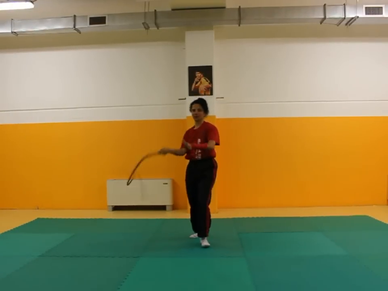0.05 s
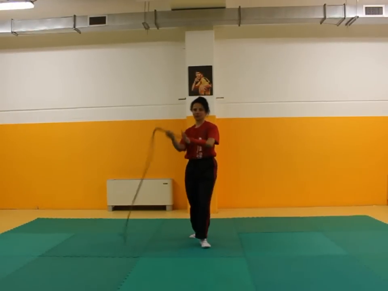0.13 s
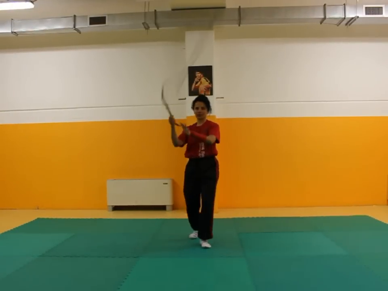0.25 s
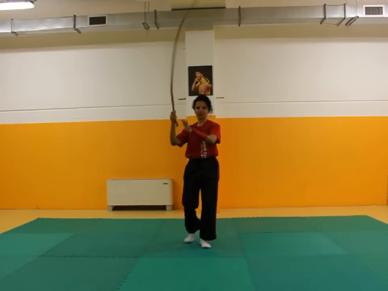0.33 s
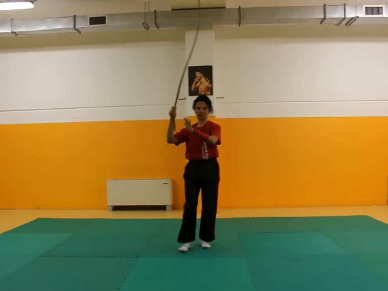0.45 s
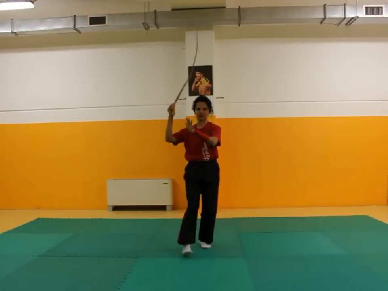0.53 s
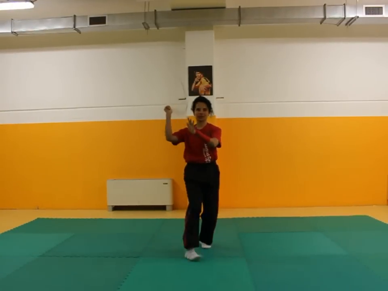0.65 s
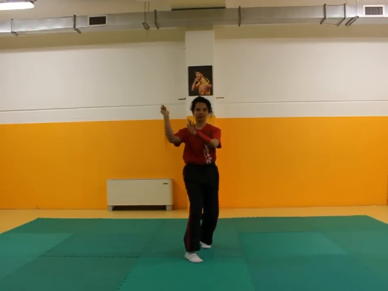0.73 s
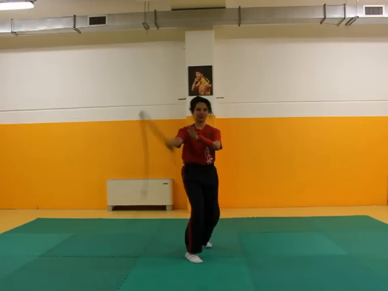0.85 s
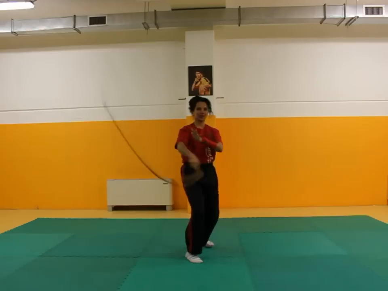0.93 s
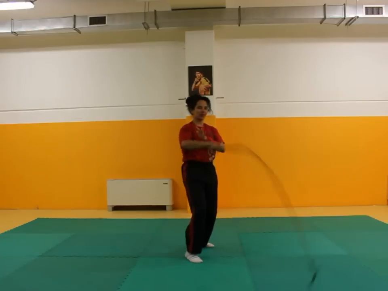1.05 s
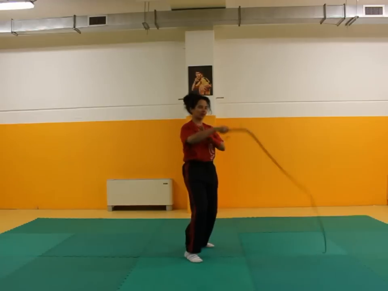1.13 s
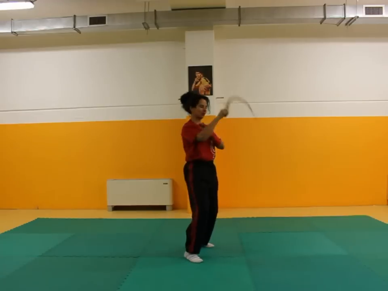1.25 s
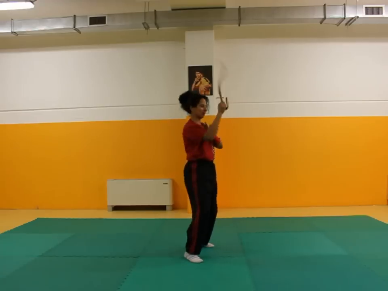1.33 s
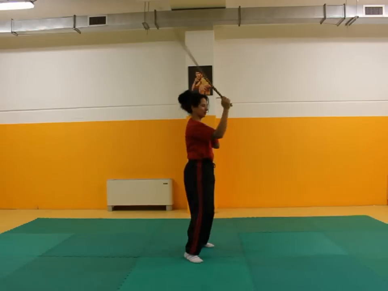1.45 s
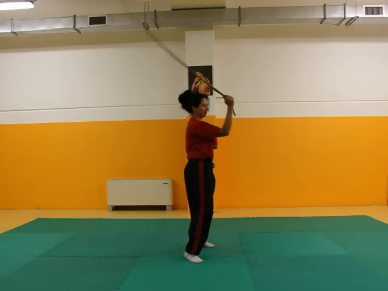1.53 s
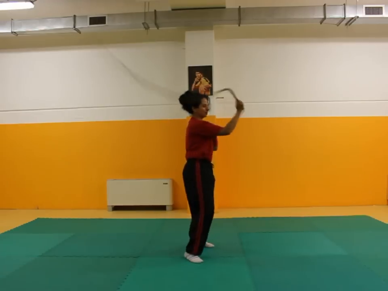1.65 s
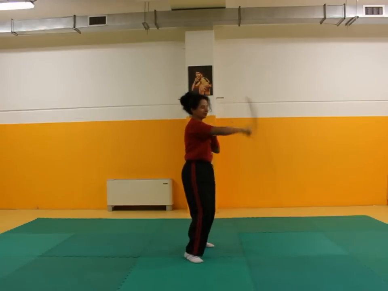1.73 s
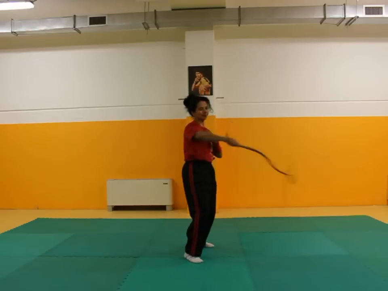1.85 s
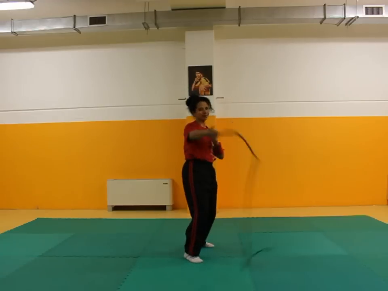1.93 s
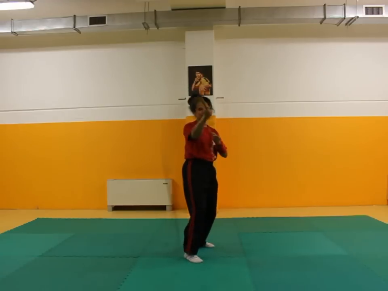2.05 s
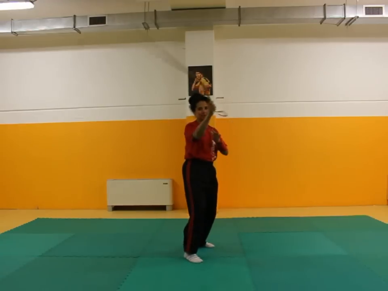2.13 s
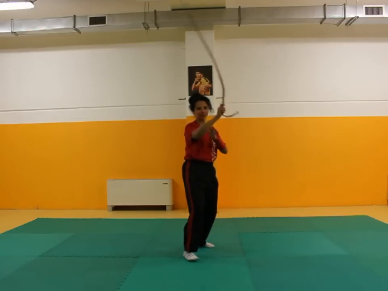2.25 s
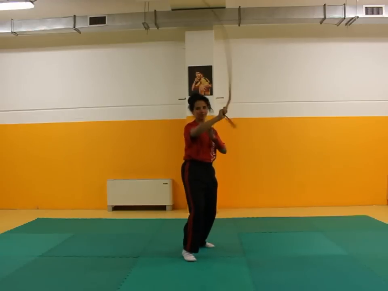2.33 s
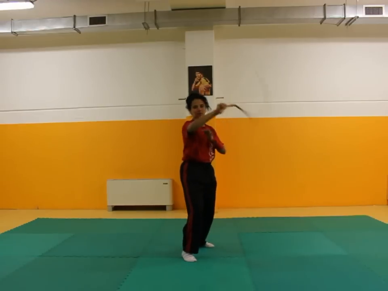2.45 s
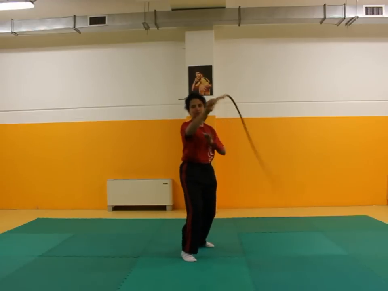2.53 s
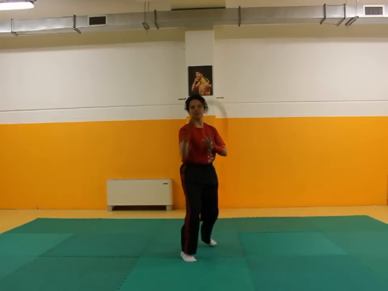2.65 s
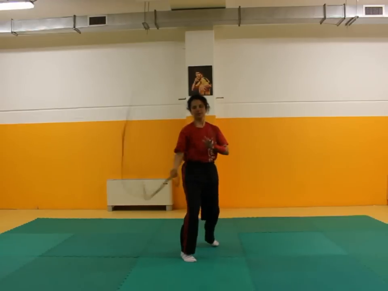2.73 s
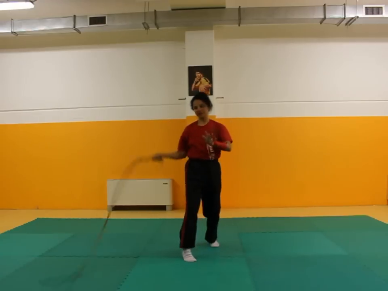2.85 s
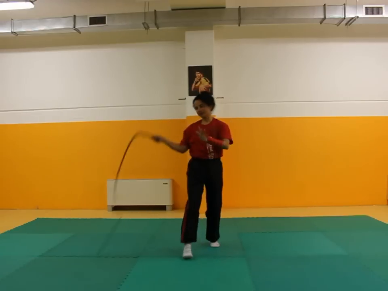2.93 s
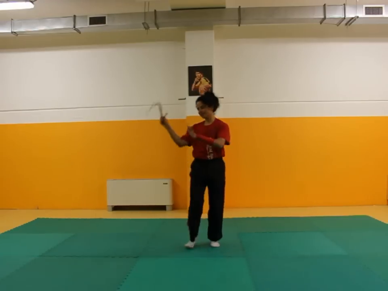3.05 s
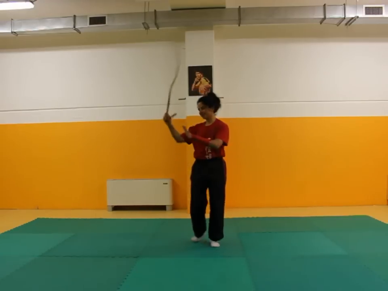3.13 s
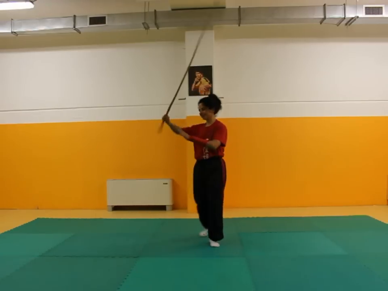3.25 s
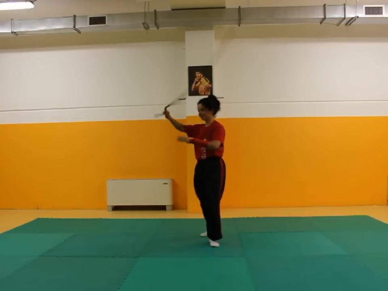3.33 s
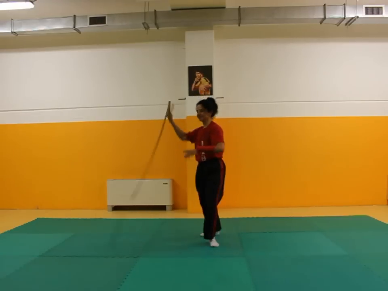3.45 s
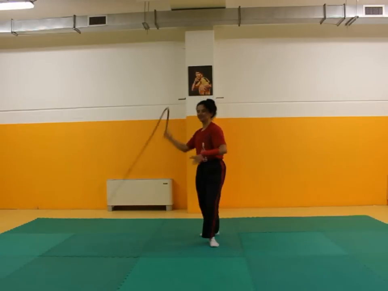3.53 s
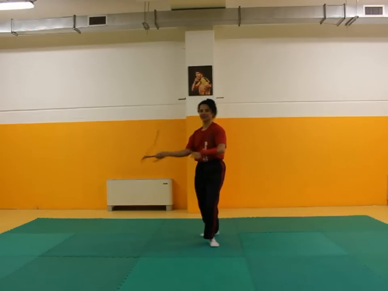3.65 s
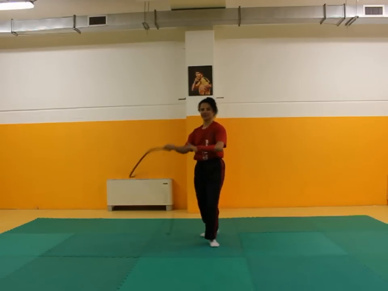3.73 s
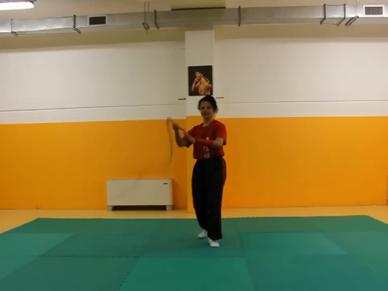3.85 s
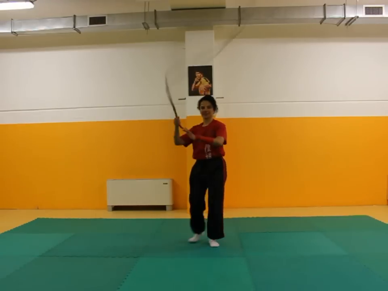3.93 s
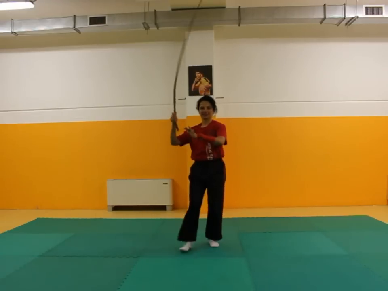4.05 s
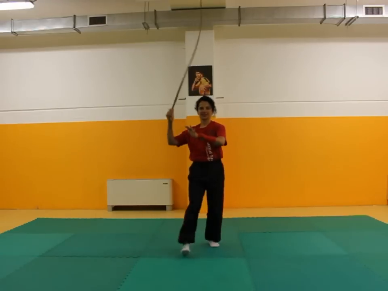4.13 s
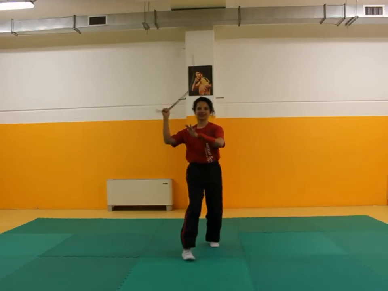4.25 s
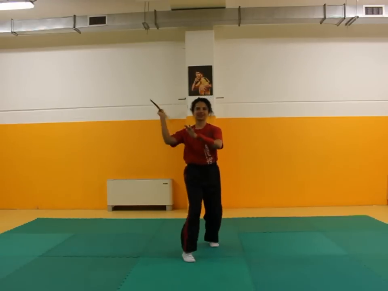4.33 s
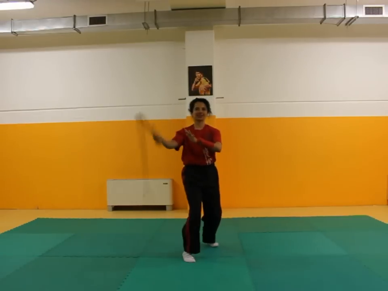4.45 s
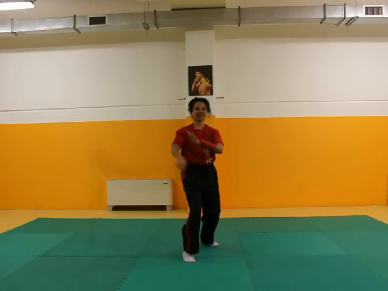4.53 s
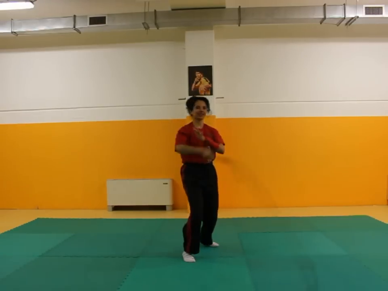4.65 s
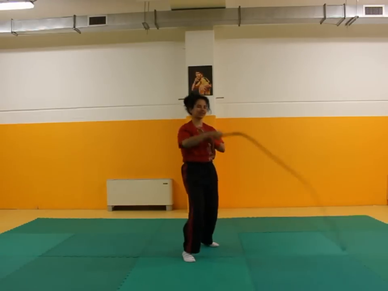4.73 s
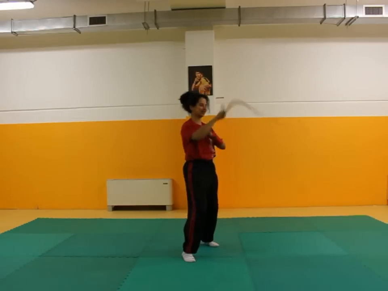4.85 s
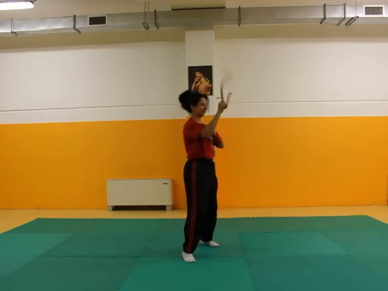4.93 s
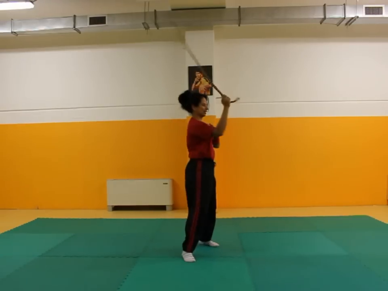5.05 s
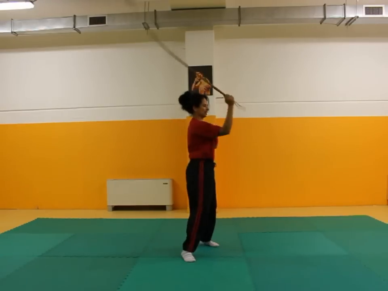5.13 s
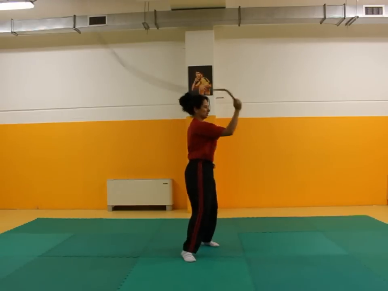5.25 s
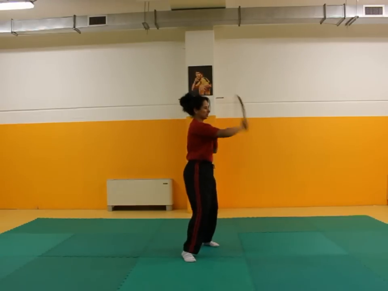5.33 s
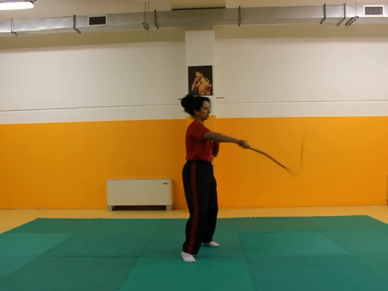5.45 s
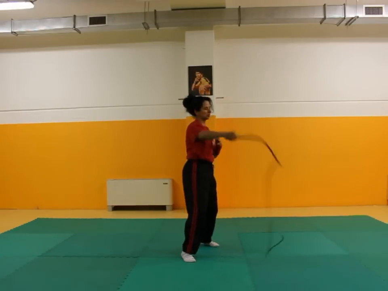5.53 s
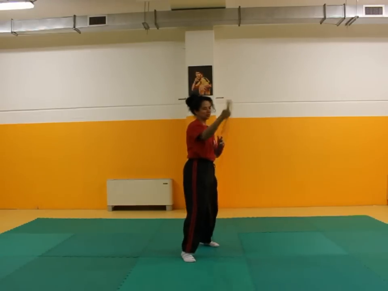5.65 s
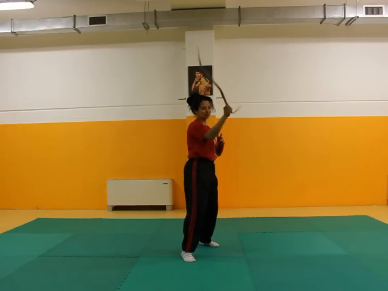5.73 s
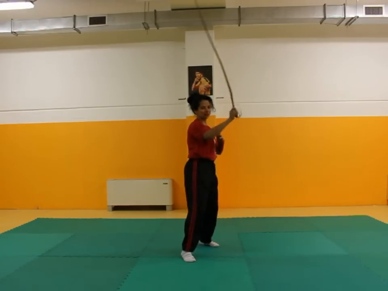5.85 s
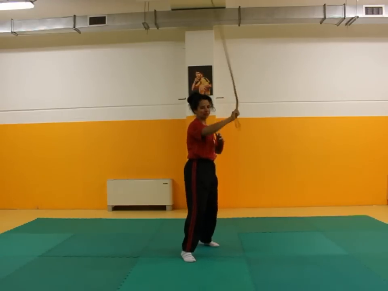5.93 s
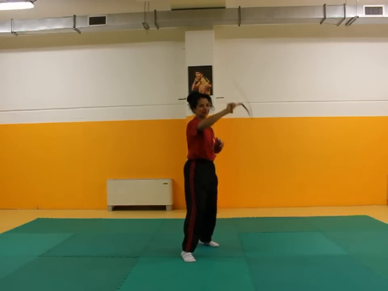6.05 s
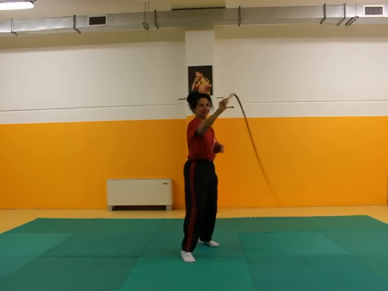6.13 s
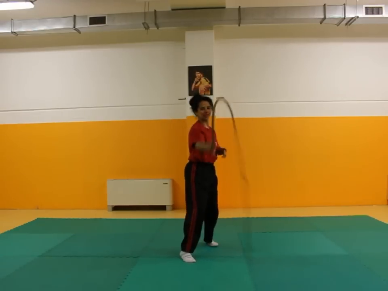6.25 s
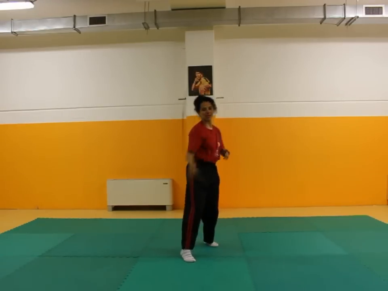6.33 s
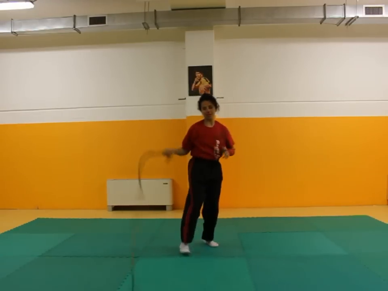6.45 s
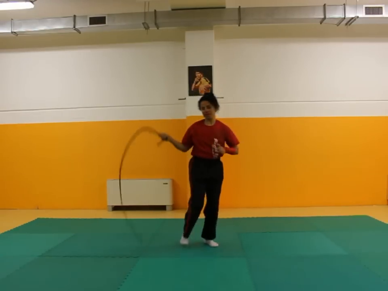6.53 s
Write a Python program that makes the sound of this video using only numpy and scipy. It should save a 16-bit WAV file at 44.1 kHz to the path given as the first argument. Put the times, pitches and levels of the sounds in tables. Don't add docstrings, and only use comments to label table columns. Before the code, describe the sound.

The scene opens inside the ringing tail of a whip crack in a large bare hall. At about 0.04 and 0.1 seconds the lash slaps a floor mat, two hollow thuds, the second stronger. A light air swish passes at 0.4, another swells from 0.8, and a piercing crack bursts at 0.9, clipping the microphone, with reflections clustered within some thirty milliseconds. Further cracks come at 1.8, 2.7, 3.6, 4.5, 5.4 and 6.3, varying in brightness and weight. After each, the gain ducks, then raises the dense, hissing reverberation, which darkens as its treble dies. Thin swishes appear near 2.55, 3.6, 3.95, 4.35, 5.2, 5.3 and just before the last crack. Softer mat contacts fall at 3.8 and 6.4. Low rumble and room air lie underneath; the last tail is still ringing at the end.

```python
import sys
import numpy as np
from scipy import signal
from scipy.fft import rfft, irfft, next_fast_len
from scipy.io import wavfile

SR = 44100
rng = np.random.default_rng(int(sys.argv[2]) if len(sys.argv) > 2 else 0)


def master(y):
    cut = np.clip(np.atleast_2d(y).T, -1, 1)
    pcm = np.round(cut * 32767)
    wavfile.write(sys.argv[1], SR, pcm.astype(np.int16))


def linear_from_db(decibels):
    return 10 ** (np.asarray(decibels, float) / 20)


N = 291060
ENVELOPE_STEP = 32


def rms_one(x):
    return x / np.sqrt(np.mean(x ** 2) + 1e-20)


def at_hz(points, hz):
    table_hz, value = np.transpose(points)
    return np.interp(np.log(hz), np.log(table_hz), value)


def drift(rate_hz):
    knots = rng.standard_normal(8000)
    return np.interp(np.arange(N) / SR * rate_hz, np.arange(8000), knots)


def bands():
    size = next_fast_len(N)
    white = rfft(rng.standard_normal(size))
    place = 5 * np.log2(np.arange(1, size // 2 + 2) * SR / size / 25)
    for k in range(48):
        edge = np.cos(np.pi / 2 * np.clip(place - k, -1, 1))
        yield 25 * 2 ** (k / 5), irfft(white * edge, size)[:N]


def coloured(bank, spectrum):
    return rms_one(sum(noise * linear_from_db(at_hz(spectrum, hz)) for hz, noise in bank))


def resonance(x, hz, width_hz):
    r = np.exp(-np.pi * width_hz / SR)
    side = (1 - r * r) / 2
    return signal.lfilter([side, 0, -side], [1, -2 * r * np.cos(2 * np.pi * hz / SR), r * r], x)


def dying(s, db, t60_s):
    age = np.arange(0, N, ENVELOPE_STEP) / SR - s
    return (age >= 0) * linear_from_db(db - 60 * np.maximum(age, 0) / t60_s) ** 2


def height(power):
    return np.repeat(np.sqrt(power), ENVELOPE_STEP)[:N]


CRACK_S = [
    -.06,
    .9018,
    1.8006,
    2.6912,
    3.6165,
    4.5255,
    5.4325,
    6.2975,
]


def next_crack(s):
    return min([crack for crack in CRACK_S if crack > s] + [N / SR])


# frequency in Hz, t60 in seconds.
HALL_T60 = [(60, 1.7), (200, 5.46), (450, 3.8), (800, 2.11), (1500, 3.352), (2500, 3.43), (4000, 2.18),
            (6000, 1.43), (9000, 0.77), (12000, 0.59), (16000, 0.27)]
# strength in dB, treble in dB per octave, middle in dB per octave, bass in dB.
TAILS = [(2, 7.5, -0.5, 9), (12, -1.5, 1.34, 1.5), (14, -0.7, 2, 1.49), (13, 2, 2.5, 1.5), (1, 3.5, 0, 1),
         (9, -1.4, 1.2, 3.7), (12.5, -0.3, 2.17, 3.5), (-3.5, 5, -1, 0.1)]


def tail_power(hz):
    octaves = np.log2(hz / 4500)
    treble, middle = max(octaves, 0), np.clip(octaves, -2, 0)
    bass = np.clip(np.log2(1100 / hz), 0, 1)
    t60_s = at_hz(HALL_T60, hz)
    power = 0
    for s, (db, treble_db, middle_db, bass_db) in zip(CRACK_S, TAILS):
        power = power + dying(s, db + treble * treble_db + middle * middle_db + bass * bass_db, t60_s)
    return power


# ducked level in dB, climb in seconds, top level in dB, last level in dB.
HELD = [(-33, 0.14, -21, -33.5), (-20.5, 0.54, -18, -23), (-18.5, 0.45, -18.5, -26.5),
        (-20, 0.41, -19.5, -27), (-28.5, 0.195, -20, -31.5), (-20.5, 0.476, -17.5, -26.5),
        (-19.5, 0.53, -19, -26), (-22.5, 0.14, -20.5, -24.5)]


def held_db():
    duck_s, sag_bend = 0.0089, 0.79
    part = np.linspace(0, 1, num=6)
    points = []
    for s, end, (ducked_db, climb_s, top_db, last_db) in zip(CRACK_S, CRACK_S[1:] + [N / SR], HELD):
        points.append((s + duck_s, ducked_db))
        sag_s = s + climb_s + part * (end - s - climb_s)
        points += zip(sag_s, top_db + (last_db - top_db) * part ** sag_bend)
    return np.interp(np.arange(N) / SR, *np.transpose(points))


# frequency in Hz, level in dB per Hz.
YOUNG_TAIL = [(71, -68), (120, -27), (227, -26), (291, -22), (396, -19), (528, -18.5), (1020, -7.5),
              (1280, -6), (1420, -6), (5070, -4), (13600, -17.5), (15400, -14), (16400, -44)]


def hall_tail(bank):
    tail, middle_power = 0, 0
    for hz, noise in bank:
        power = tail_power(hz) * linear_from_db(at_hz(YOUNG_TAIL, hz)) ** 2
        tail = tail + noise * height(power)
        if 1500 < hz < 5000:
            middle_power = middle_power + power * np.mean(noise ** 2)
    gain = linear_from_db(held_db()) / height(middle_power)
    youth = height(sum(dying(s, 0, 0.073) for s in CRACK_S))
    grain_db = .6 * drift(14) + youth * (3.5 * drift(1500) - 2.5)
    return gain * tail * linear_from_db(grain_db), gain / np.median(gain)


# frequency in Hz, level in dB per Hz.
ROOM_TONE = [(60, -34), (110, -9), (180, 7), (350, 9), (700, -3.5), (2000, -18), (6000, -29), (9000, -71)]


def room_tone(bank, lift):
    reversed_noise = coloured(bank, ROOM_TONE)[::-1]
    return reversed_noise * linear_from_db(-42) * lift


# frequency in Hz, level in dB per Hz.
RUMBLE_COLOUR = [(20, -14), (45, 11.5), (90, 12), (160, -12), (300, -48.5)]


def rumble(bank, lift):
    rumble_db, lumps_db, follows = -64, 2.5, 1.76
    thump = height(sum(dying(s, -42, .06) for s in CRACK_S))
    level = linear_from_db(rumble_db + lumps_db * drift(21)) * lift ** follows
    return coloured(bank, RUMBLE_COLOUR) * (level + thump)


# frequency in Hz, width in Hz, level in dB, drift in dB per second.
MAT = [(653, 220, 0, 0.5), (764, 190, 0.3, -15), (353, 45, -15.5, -5)]
# start in seconds, rise in seconds, thud in dB, sound carried on by the hall in dB.
SLAPS = [
    (.036, .01, -20.5, -22.5),
    (.1, 0.013, -16, -30),
    (3.77, 0.044, -32, -36),
    (6.384, 0.0078, -34, -22),
]


def slaps():
    thud_t60_s, carry_t60_s = 0.0667, 3.45
    t, noise, out = np.arange(N) / SR, rng.standard_normal(N), np.zeros(N)
    hollows = [rms_one(resonance(resonance(noise, hz, width_hz), hz, width_hz)) for hz, width_hz, _, _ in MAT]
    for s, rise_s, thud_db, carry_db in SLAPS:
        age = np.maximum(t - s - rise_s, 0)
        level = linear_from_db(thud_db - 60 * age / thud_t60_s) + linear_from_db(carry_db - 60 * age / carry_t60_s)
        level = linear_from_db(-6.5) * level * np.clip((t - s) / rise_s, 0, 1) * (t < next_crack(s))
        for hollow, (_, _, db, drift_db) in zip(hollows, MAT):
            out += level * hollow * linear_from_db(db + drift_db * np.clip(t - s, 0, 1))
    return out


# frequency in Hz, level in dB per Hz.
SWISH_COLOUR = [(200, 10), (400, 25.5), (1000, -32), (3000, -18), (7000, 1.5), (11000, 6.5), (15000, -4),
                (17000, -31)]
# start in seconds, length in seconds, level in dB, change over the swing in dB.
SWISH = [
    (0.362, 0.19, -43.5, -5),
    (0.774, 0.18, -52, 11),
    (2.553, 0.098, -47.5, -7),
    (3.599, .006, -42, 5),
    (3.95, .11, -44, -4),
    (4.357, 0.17, -46, -8),
    (5.16, 0.043, -44, -8),
    (5.31, .118, -46, -5),
    (6.146, 0.022, -46.5, -2.5),
    (6.24, .045, -47.5, -14),
]
RUSH_DB = [-32.5, -47, -47, -58, -27, -69, -48]


def swish(bank):
    rise_s, t60_per_length, rush_s = 0.019, 3.0, 0.0057
    t, level = np.arange(N) / SR, np.zeros(N)
    for s, length_s, db, change_db in SWISH:
        fade_db = -60 * np.maximum(t - s - length_s, 0) / (t60_per_length * length_s)
        swing_db = db + change_db * np.clip((t - s) / length_s, 0, 1)
        rise = np.clip((t - s) / min(rise_s, length_s) + .5, 0, 1)
        level += linear_from_db(swing_db + fade_db) * rise * (t < next_crack(s))
    for s, db in zip(CRACK_S[1:], RUSH_DB):
        level += linear_from_db(db) * np.exp(np.minimum((t - s) / rush_s + 2, 0)) * (t < s)
    shifted_noise = np.roll(coloured(bank, SWISH_COLOUR), N // 2)
    return linear_from_db(4.5) * level * shifted_noise


# level in dB, length in seconds.
BURSTS = [
    (3, .003),
    (-4, .002),
    (-7, .003),
    (-14, .0054),
    (0, .0032),
    (0, .0007),
    (-14, .006),
]


def bursts():
    out, lead = np.zeros(N), round(SR / 25)
    age = (np.arange(2 * lead) - lead) / SR
    for s, (db, length_s) in zip(CRACK_S[1:], BURSTS):
        gate = np.clip(age / .0012, 0, 1) * np.exp(-np.maximum(age - length_s, 0) / .0005)
        run_up = linear_from_db(-39) * np.exp(age / 0.0065) * (age < 0)
        noise = signal.lfilter([.7], [1, -.3], rng.standard_normal(len(age)))
        i = round(s * SR) - lead
        out[i:i + len(age)] += (linear_from_db(db) * gate + run_up) * noise
    return out


# start in seconds, peak in dB, length in seconds, centre in Hz.
ECHOES = [(.9028, 0, .0021, 4000), (.9094, 2, .0015, 2800), (.9122, -4, 0, 3900),
          (.9147, -1.5, .0013, 4100), (.9273, -5, .0027, 3000), (1.801, .5, .003, 3100),
          (1.8063, 1.5, .0032, 3800), (1.811, -1.5, .0017, 5000), (1.8151, -3, .0035, 4200),
          (2.6916, -1, .0023, 3200), (2.6985, 1, .0022, 3200), (2.7049, -5.5, .0012, 3400),
          (2.713, -7, .0058, 3800), (3.6169, -1, .0051, 6500), (3.6262, -9, 0, 5000),
          (3.6276, -2.5, .0025, 5000), (3.6353, -7, 0, 5500), (4.5269, 1, .0025, 6000),
          (4.5353, -1, .0013, 3200), (4.5403, -4, .0014, 3500), (4.5479, -3, 0, 3600),
          (4.5541, -5.5, .001, 3800), (4.5642, -5.5, .003, 4200), (5.4329, -1, 0, 1550),
          (5.437, 0, .0125, 3400), (6.302, -4, 0, 4000), (6.3044, -1, .0011, 2100), (6.3103, -4, 0, 6000),
          (6.3238, -1.5, 0, 4500), (6.3257, -6, .0012, 5000)]


def fronts():
    gap_s, gap_spread, spread_db, pitch_spread = .0012, .15, 1.5, .2
    out, n = np.zeros(N), np.arange(200)
    for start, arrival_db, length_s, centre_hz in ECHOES:
        for k in range(round(length_s / gap_s) + 1):
            late, strong, high = rng.standard_normal(3)
            s = start + gap_s * (k + gap_spread * late * (k > 0))
            db = arrival_db + spread_db * strong
            hz = centre_hz * np.exp(pitch_spread * high * (length_s > 0))
            cycles = n * hz / SR
            n_wave = (1 - 2 * cycles) * (cycles < 1)
            ring = np.sin(2 * np.pi * cycles) * np.exp(-cycles / .9)
            wake = rng.standard_normal(200) * np.exp(-n / (.0006 * SR))
            i = round(s * SR - SR / hz / 4)
            out[i:i + 200] += linear_from_db(db + 1.5) * (.75 * ring + .55 * n_wave + .3 * wake)
    return out


PUSH_S = [.9031, .9065, 1.8016, 1.8075, 2.6993, 3.6182, 4.5283, 4.532, 5.4328, 5.438, 6.3042]
# level in dB, length in seconds.
PUSHES = [(7.5, 0.00066), (-19, 0.0015), (-25, 0.0028), (-7, 0.00087), (-2.5, 0.0013), (-3, 0.00084),
          (10, 0.00031), (-7, 0.00051), (-26, 0.00078), (-13, 0.0016), (-38, 0.00097)]


def pushes():
    out = np.zeros(N)
    for s, (db, length_s) in zip(PUSH_S, PUSHES):
        i, bump = round(s * SR), np.hanning(round(length_s * SR))
        out[i:i + len(bump)] += linear_from_db(db) * bump
    return signal.sosfilt(signal.butter(2, 130, "high", fs=SR, output="sos"), out + 1e-18)


def scene():
    bank = list(bands())
    tail, lift = hall_tail(bank)
    hall = tail + room_tone(bank, lift) + rumble(bank, lift)
    lash = slaps() + swish(bank)
    crack = bursts() + fronts() + pushes()
    return (hall + lash + crack)[None]


def low_pass(x):
    return signal.sosfilt(signal.butter(12, 16510, fs=SR, output="sos"), x)


def record(dry):
    clipped = np.clip(dry, -.98, .98)
    cut = signal.sosfilt(signal.cheby2(16, 55, 16200, fs=SR, output="sos"), clipped)
    return low_pass(cut)


dry = scene()
out = record(dry)
master(out)
```